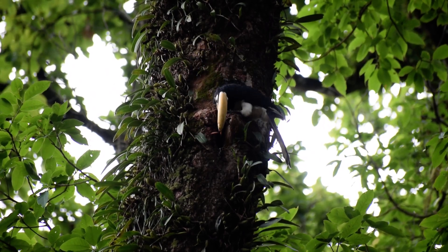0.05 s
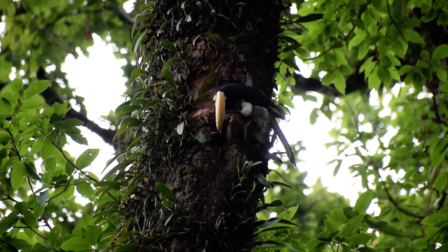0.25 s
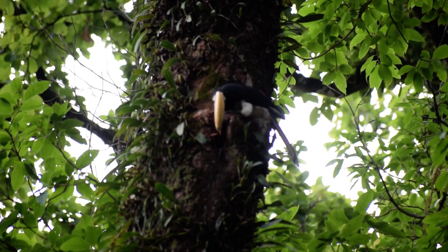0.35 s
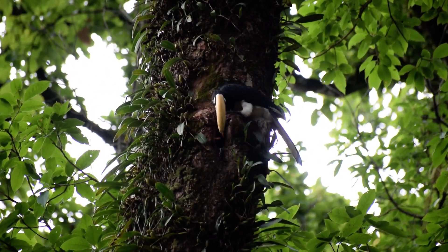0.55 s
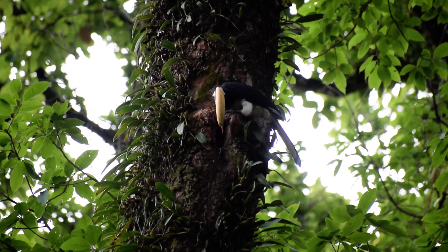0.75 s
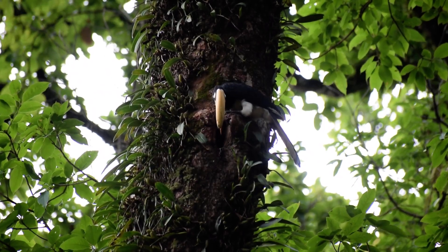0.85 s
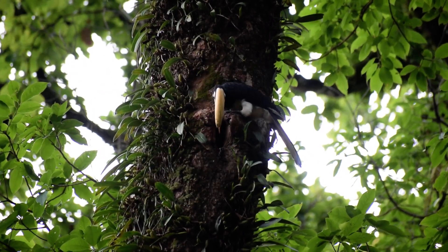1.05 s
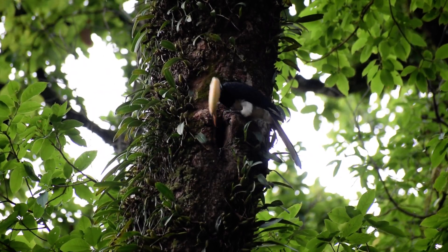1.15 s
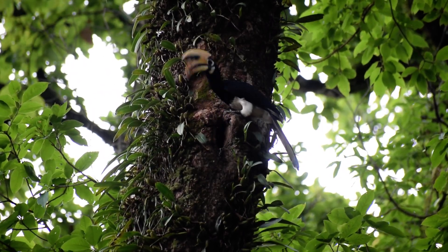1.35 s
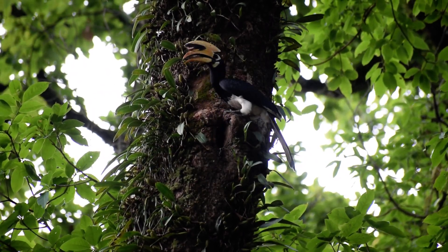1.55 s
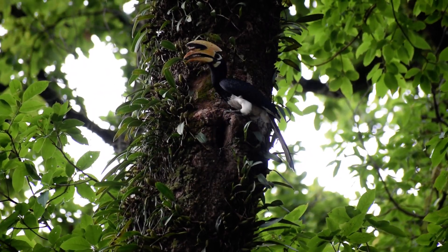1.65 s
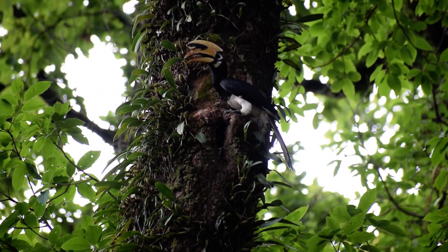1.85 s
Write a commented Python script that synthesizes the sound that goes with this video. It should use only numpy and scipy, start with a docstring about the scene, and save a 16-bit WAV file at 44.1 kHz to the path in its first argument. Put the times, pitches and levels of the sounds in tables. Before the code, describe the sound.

One brief, nasal hornbill call sounds from straight ahead and dies away among the trees. Steady high insect hiss and a soft wash of distant air fill the forest, with faint far chirps and a slight rustle afterwards.

```python
"""Insects hiss steadily all round a stereo pair in a forest, over a wash of distant air and leaves.
From a tree trunk, dead centre, a hornbill gives one short yelp: an upward squeak and a held nasal
note, both harmonics shaped by its throat, then a rasping close as the voice breaks into pulses.
The trunks throw the call back and it dies away; faint far chirps and a soft rustle follow."""
import sys
import numpy as np
from scipy import signal
from scipy.fft import rfft, irfft
from scipy.io import wavfile
from scipy.ndimage import uniform_filter1d

SR = 44100
rng = np.random.default_rng(int(sys.argv[2]) if len(sys.argv) > 2 else 0)


def pcm_store(signal):
    """Save signal as 16-bit PCM."""
    levels = np.round(np.clip(np.atleast_2d(signal), -1, 1) * 32767)
    wavfile.write(sys.argv[1], SR, levels.astype(np.int16).T)


N = 83790
T = np.arange(N) / SR
HZ = np.fft.rfftfreq(N, 1 / SR)
CUTOFF_HZ = 15700

# the throat's response to the rasp and to breath in the voice: f/Hz, gain/dB
BREATH_THROAT = [(500, -40), (900, -23), (1300, -5), (1800, -7.5), (2400, -4.5), (3200, 0), (4100, -1.5),
                 (5200, 0), (7000, -18), (14000, -37)]


def amp(db):
    """Decibels to gain."""
    return 10 ** (np.asarray(db) / 20)


def unit(x):
    """Scales to rms 1."""
    return x / np.sqrt(np.mean(x ** 2) + 1e-20)


def read(spectrum, hz):
    """Reads a spectrum table on a log-frequency axis."""
    f, value = np.transpose(spectrum)
    return np.interp(np.log(hz + 1), np.log(f + 1), value)


def curves(table):
    """Each column of a timed table, sample by sample."""
    times, *columns = np.transpose(table)
    return [np.interp(T, times, column) for column in columns]


def gate(table, edge_s=0.0024):
    """Open from a table's first row to its last, with soft edges."""
    return np.clip(np.minimum(T - table[0][0], table[-1][0] - T) / edge_s + .5, 0, 1)


def colour(x, spectrum):
    """Filters by a spectrum table, keeping the power of white noise."""
    return irfft(rfft(x) * unit(amp(read(spectrum, HZ))), N)


def wander(rate_hz):
    """Smooth random motion of rms 1."""
    return unit(irfft(rfft(rng.standard_normal(N)) * np.exp(-.5 * (HZ / rate_hz) ** 2), N))


def fuzzy_tone(hz, width_hz):
    """A tone blurred into a narrow band."""
    phase = 2 * np.pi * np.cumsum(hz * np.ones(N)) / SR
    return unit(wander(width_hz / 2) * np.cos(phase) + wander(width_hz / 2) * np.sin(phase))


def wash(spectrum, level_db, patchy_db, swell_db):
    """Noise all round the microphones, wider in the treble, with drifting patches and a slight swell."""
    # likeness of left and right: f/Hz, correlation
    likeness = [(60, 0.99), (300, 0.99), (700, 0.92), (1500, 0.94), (3000, 0.81), (6000, 0.82),
                (9000, 0.52), (14000, 0.45)]
    hz, _, noise = signal.stft(rng.standard_normal((2, N)), SR, nperseg=512)
    same = read(likeness, hz)[:, None]
    mid, side = noise[0] * np.sqrt(1 + same), noise[1] * np.sqrt(1 - same)
    patches = uniform_filter1d(rng.standard_normal(mid.shape), size=5, axis=0)  # across frequency
    patches = unit(uniform_filter1d(patches, size=12, axis=1))  # across time
    patchy = np.array([mid + side, mid - side]) * amp(patchy_db * patches)
    pair = signal.istft(patchy, SR, nperseg=512)[1][:, :N]
    return amp(level_db) * unit(colour(pair, spectrum) * amp(swell_db * wander(9.6)))


def distant_air():
    """A soft bed of air and leaves, far off."""
    # spectrum of the air: f/Hz, relative level/dB
    spectrum = [(25, -46), (45, -25), (70, -14), (140, -5.5), (205, -5.5), (260, 2), (320, -2.5),
                (390, -1.5), (540, -5), (1000, -2.5), (1700, -5), (2800, -8), (3700, -14), (5000, -16),
                (10000, -29), (15500, -38)]
    return wash(spectrum, level_db=-49.5, patchy_db=1.1, swell_db=0.26)


def insect_chorus():
    """Insects on every side merge into a steady hiss."""
    # spectrum of the chorus: f/Hz, relative level/dB
    spectrum = [(4000, -47), (4900, -13), (5500, 0.5), (6300, -1), (7200, -3), (8400, -2), (9000, -6),
                (9700, -14.5), (10700, -24), (11500, -19.5), (12700, -32), (13800, -29), (15500, -42)]
    return wash(spectrum, level_db=-44.5, patchy_db=1.06, swell_db=0.01)


def high_insect():
    """One insect's thin high buzz sinks a little and fades."""
    # course of the buzz: t/s, centre f/Hz, level/dB
    buzz = [(0, 11300, -63.5), (.55, 11260, -61.5), (.8, 11050, -66), (1.05, 11000, -65), (1.2, 11100, -77)]
    hz, db = curves(buzz)
    left, both, right = [fuzzy_tone(hz, width_hz=500) for _ in range(3)]
    return amp(db) * unit(np.array([left + both, right + both]))


def far_chirps():
    """Other birds, faint and blurred by distance."""
    # chirps: t/s, length/s, f/Hz, width/Hz, level/dB
    chirps = [(.748, .022, 3750, 400, -49), (0.755, 0.067, 2710, 446, -52), (0.797, .22, 2880, 110, -59.5)]
    return sum(amp(db) * np.sin(np.pi * np.clip((T - start) / length, 0, 1)) * fuzzy_tone(hz, width)
               for start, length, hz, width, db in chirps)


def rustle():
    """A soft stir of leaves as the bird lifts its head."""
    # rise and fall of the stir: t/s, level/dB
    stir = [(1.06, -85), (1.12, -55), (1.17, -68), (1.3, -85)]
    # spectrum of the leaves: f/Hz, relative level/dB
    leaves = [(1200, -25), (2600, 0), (4400, 4), (8000, -19), (13000, -40)]
    return gate(stir) * amp(curves(stir)[0]) * colour(rng.standard_normal(N), leaves)


def scatter(decay_s, width=0.19):
    """A burst of tiny reflections of energy 1, nearly alike at both microphones."""
    mid, side = rng.standard_normal((2, N)) * np.exp(-T / decay_s)
    return unit(np.array([mid + width * side, mid - width * side])) / np.sqrt(N)


def forest(call, tail_db=-11.5, foliage_db=-10):
    """The call comes back as scatter from nearby foliage, smeared trunk echoes and a diffuse tail."""
    # echoes from trunks: delay/s, level/dB
    echoes = [(.024, -12.5), (.052, -16), (.108, -15), (.150, -25.5), (.258, -19.5), (.315, -25),
              (.41, -26.5)]
    # forest reverberation: f/Hz, time to fall 60 dB/s
    t60 = [(1000, 0.75), (2200, 1.4), (3300, 1.68), (5500, 2.2), (11000, 0.7)]
    hz, t, diffuse = signal.stft(scatter(decay_s=np.inf), SR, nperseg=256)
    decay = amp(-60 * t / read(t60, hz)[:, None])
    tail = signal.istft(diffuse * decay, SR, nperseg=256)[1][:, :N]
    response = amp(tail_db) * unit(tail) / np.sqrt(N) + amp(foliage_db) * scatter(decay_s=0.023)
    for delay, db in echoes:
        response += amp(db) * np.roll(scatter(decay_s=0.0065), round(delay * SR), axis=1)
    return signal.fftconvolve(call[None], response, axes=1)[:, :N]


def voice(pitch, throat, rough, jitter, lift_db):
    """Jittered harmonics and a puff of air each cycle, both shaped by the throat."""
    lag_rad = 0.569  # times harmonic number squared: the throat delays higher harmonics more
    phase = 2 * np.pi * np.cumsum(pitch * (1 + jitter * wander(300))) / SR
    gains = [amp(read(throat, k * pitch)) * (k * pitch < CUTOFF_HZ) for k in range(1, 14)]
    tone = sum(gain * amp(lift_db(k)) * np.cos(k * phase - lag_rad * k * k)
               for k, gain in enumerate(gains, 1))
    throat_rms = np.sqrt(sum(gain ** 2 for gain in gains) / 2)
    puffs = colour(rng.standard_normal(N) * (1 + np.cos(phase)), BREATH_THROAT)
    return tone / throat_rms + rough * puffs


def squeak():
    """The hornbill opens with a rough sweep up through nearly an octave."""
    # course of the squeak: t/s, f/Hz, level/dB
    sweep = [(.2245, 1168, -35), (.229, 1214, -33.5), (.2338, 1320, -27.5), (.2375, 1568, -33.5),
             (.243, 1760, -32), (.245, 2094, -34), (.248, 2160, -32), (.253, 2120, -38)]
    # throat during the squeak: f/Hz, gain/dB
    throat = [(1000, -18), (1600, -4.5), (2200, -13), (2800, -3.5), (3400, 2.5), (4000, -0.5), (5000, -6.5),
              (6200, -22), (12000, -43)]
    pitch, db = curves(sweep)
    lift_db = lambda k: -14 * (k > 3)  # harmonics above the third are weak
    return gate(sweep) * amp(db) * voice(pitch, throat, rough=0.21, jitter=0.011, lift_db=lift_db)


def nasal_note():
    """The voice drops an octave and holds, swelling on its third harmonic."""
    # course of the note: t/s, f/Hz, level/dB, lift of harmonic 2/dB, lift above harmonic 4/dB
    held = [(.248, 1091, -36, 4, 3), (.262, 1096, -34, -0.5, 4), (.284, 1104, -30, -7.5, -3.5),
            (.298, 1109, -24.5, 2, 1), (.310, 1121, -28.5, 0, 2.5), (.319, 1092, -26.5, 4, 1.5),
            (.3245, 1073, -25, 7, -5), (.3285, 1090, -36.5, 18.5, -5)]
    # throat during the note: f/Hz, gain/dB
    throat = [(1100, -18), (2200, -11.5), (3200, 1.5), (3400, -1), (4400, -21), (5500, -13.5),
              (6600, -20.5), (7800, -19.5), (8800, -24.5), (10000, -29.5), (11000, -34.5), (14000, -50)]
    pitch, db, second_db, upper_db = curves(held)
    first_db = -26.5 - db  # the fundamental keeps its drive while the rest swells
    fourth_db = 21 * np.exp(-np.maximum(T - held[0][0], 0) / .025)  # starts strong and fades
    lift_db = lambda k: {1: first_db, 2: second_db, 3: 0, 4: fourth_db}.get(k, upper_db)
    return gate(held) * amp(db) * voice(pitch, throat, rough=0.056, jitter=0.0025, lift_db=lift_db)


def rasp(pulses_per_s=520, uneven=.35, breath=0.42, snap_s=.3315):
    """The note breaks up into uneven pulses and air that ring the throat, with one hard snap."""
    # drive of the rasp: t/s, level/dB
    effort = [(.322, -49), (.331, -29), (.336, -33.5), (.341, -32.5), (.350, -41), (.357, -36),
              (.372, -45.5)]
    # throat resonances: f/Hz, width/Hz, relative level/dB
    resonances = [(1300, 270, -7), (2200, 230, -3.5), (2480, 210, -1.5), (3280, 320, 3.5), (4180, 450, 0.5)]
    cycles = np.cumsum(pulses_per_s * np.exp(uneven * wander(250))) / SR
    pulses = unit(np.diff(np.floor(cycles), prepend=0))
    drive = gate(effort) * amp(curves(effort)[0]) * unit(pulses + breath * rng.standard_normal(N))
    ring = sum(amp(db) * np.exp(-np.pi * width * T) * np.sin(2 * np.pi * hz * T)
               for hz, width, db in resonances)
    ringing = signal.fftconvolve(drive, unit(ring) / np.sqrt(N))[:N]
    direct = amp(-2.5) * drive
    direct[round(snap_s * SR)] -= amp(-12.5)  # the hardest pulse
    return colour(direct + ringing / 2, BREATH_THROAT)


def scene():
    """The hornbill in the centre of the pair, the forest all round."""
    call = squeak() + nasal_note() + rasp()
    bed = distant_air() + insect_chorus()
    return bed + call + forest(call) + high_insect() + far_chirps() + rustle()


def record(dry):
    """The recorder's band limit."""
    lowpass = signal.firwin(511, CUTOFF_HZ, window=("kaiser", 9), fs=SR)
    return signal.oaconvolve(dry, lowpass[None], "same")


dry = scene()
out = record(dry)
pcm_store(out)
```